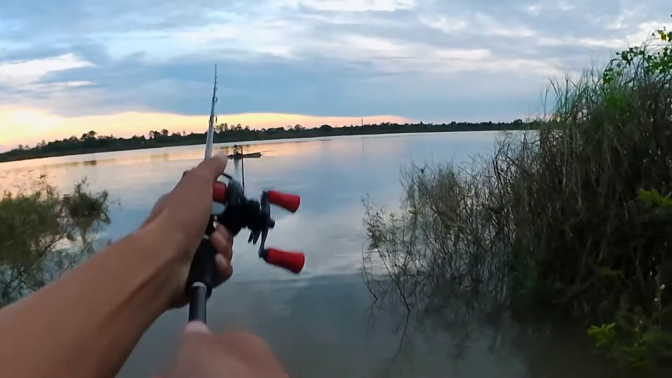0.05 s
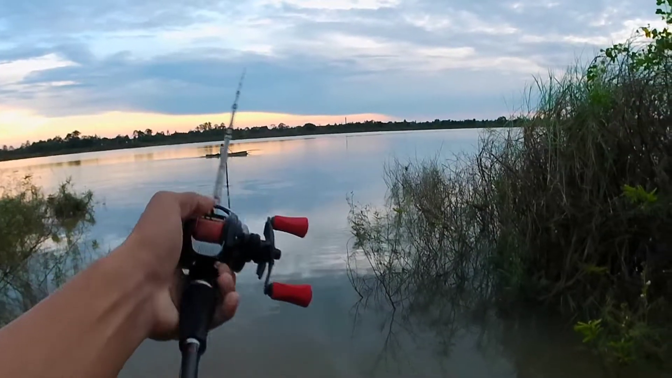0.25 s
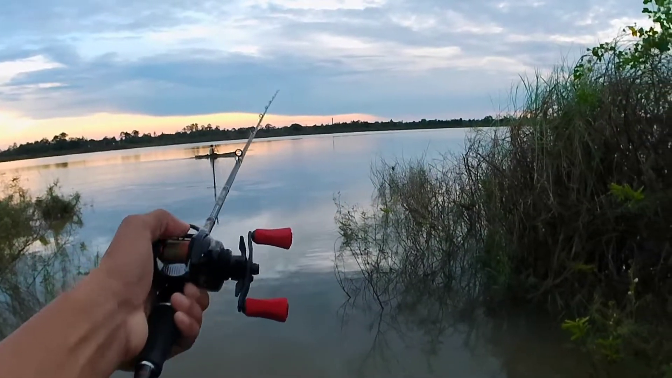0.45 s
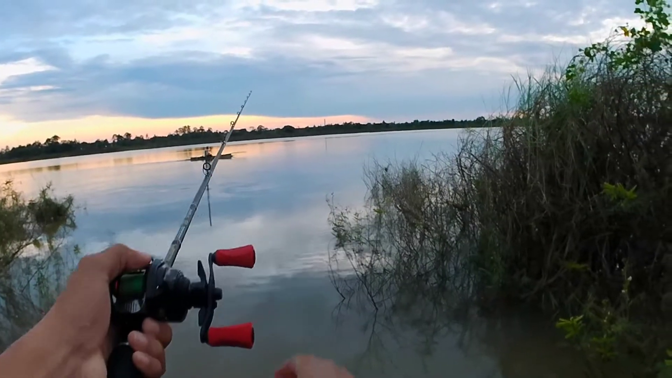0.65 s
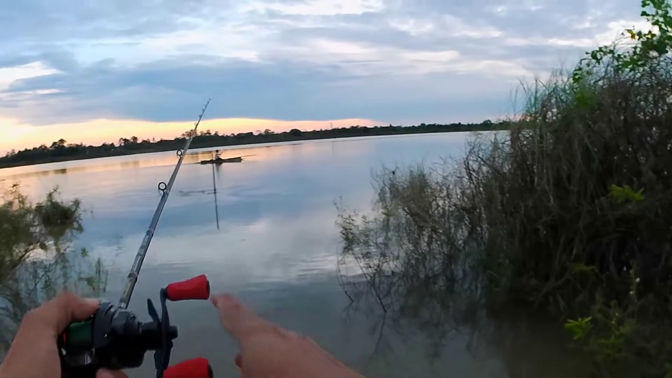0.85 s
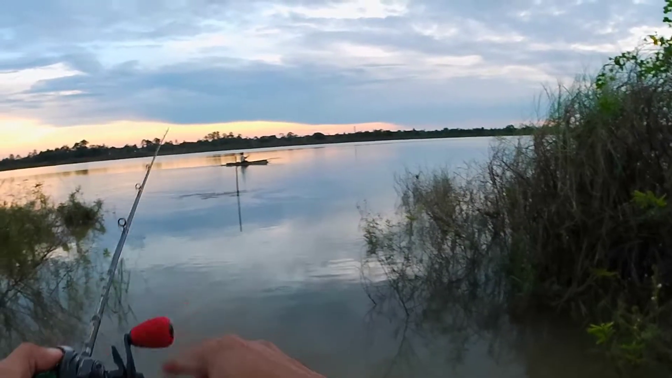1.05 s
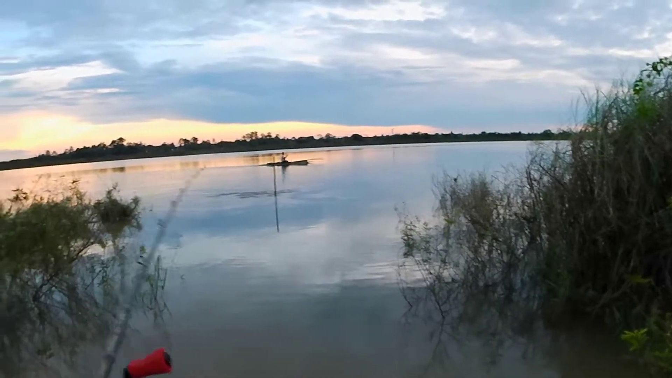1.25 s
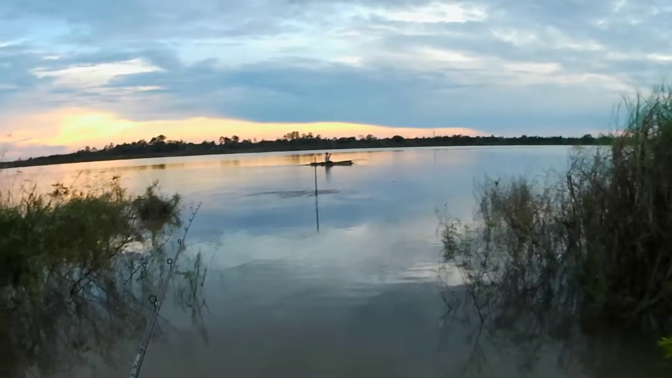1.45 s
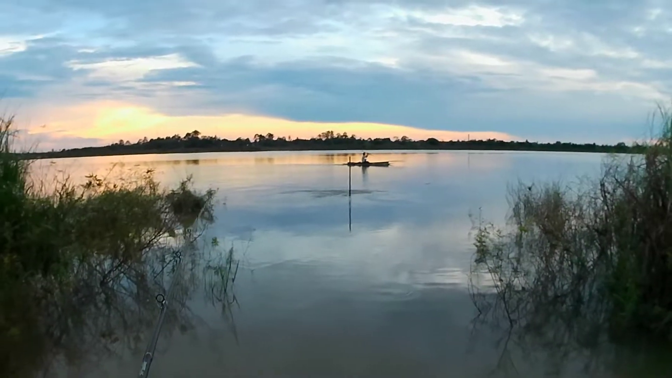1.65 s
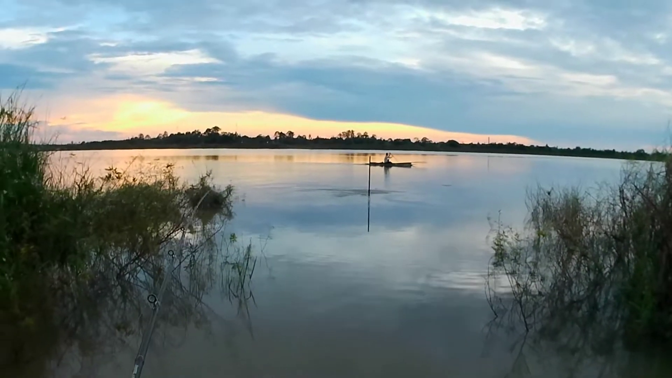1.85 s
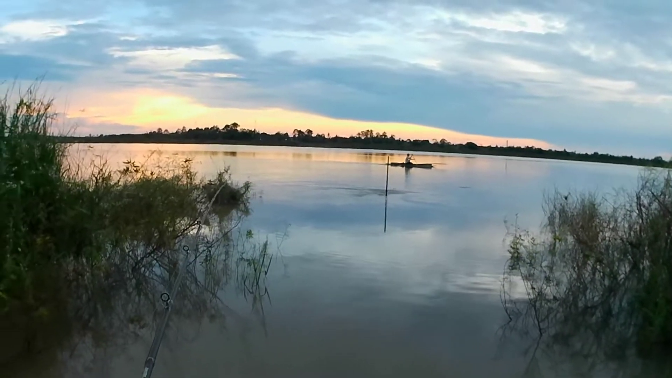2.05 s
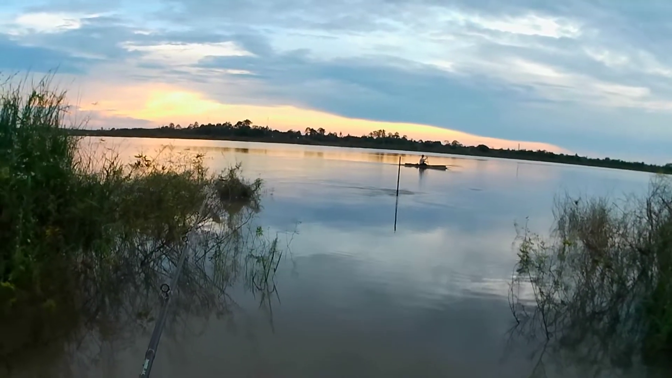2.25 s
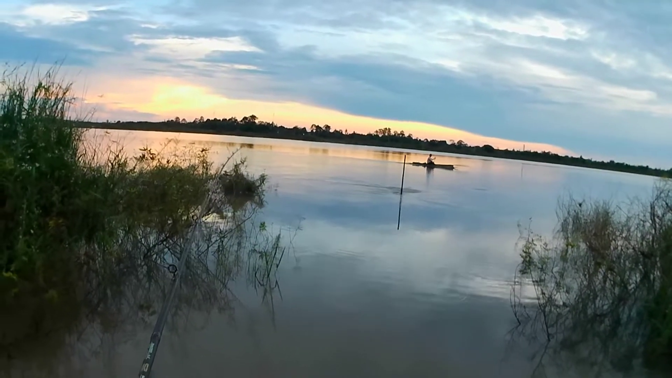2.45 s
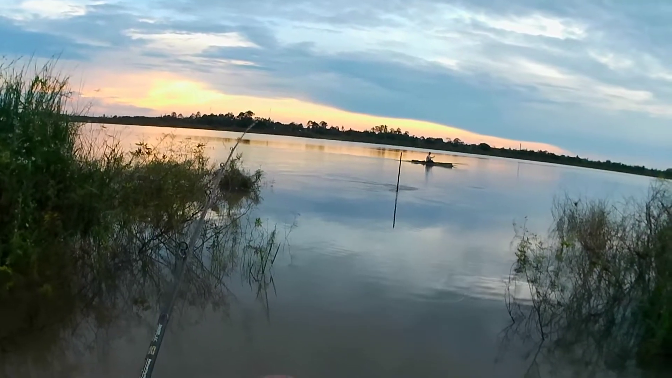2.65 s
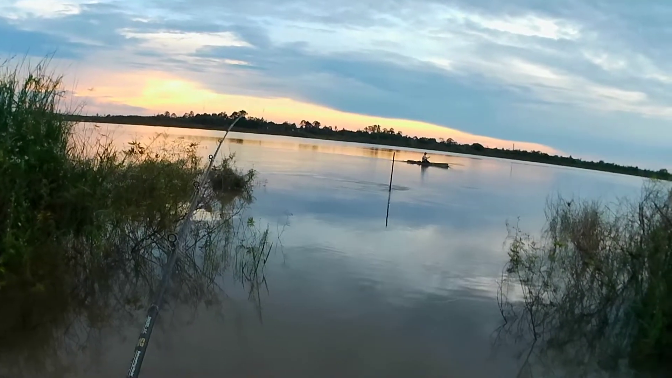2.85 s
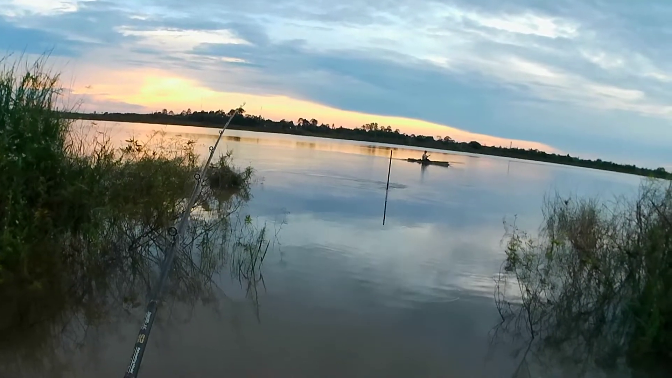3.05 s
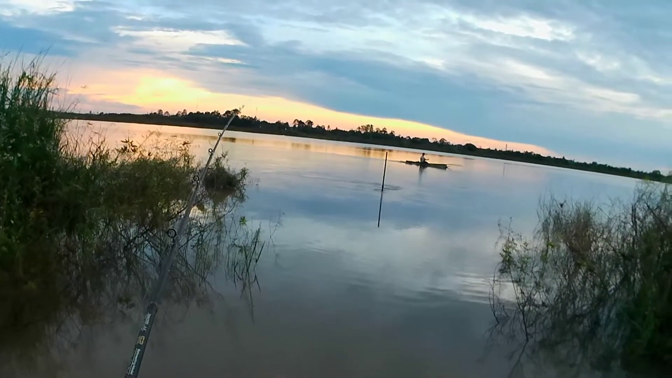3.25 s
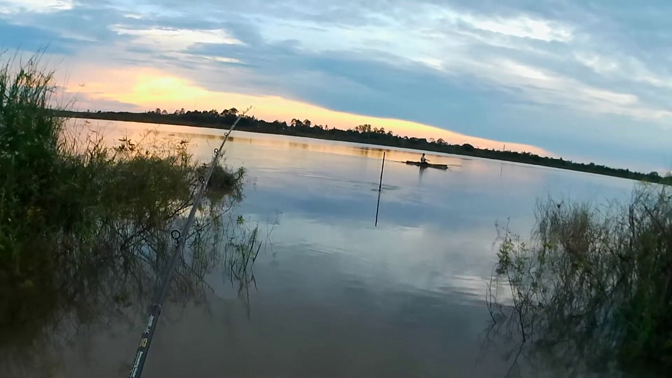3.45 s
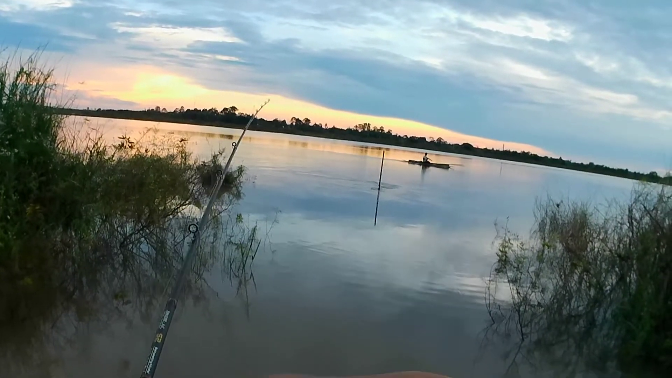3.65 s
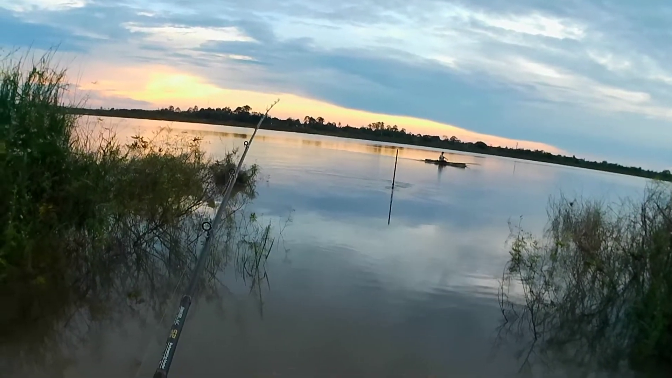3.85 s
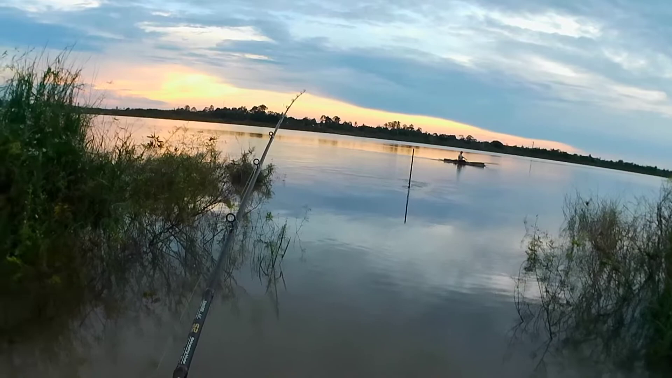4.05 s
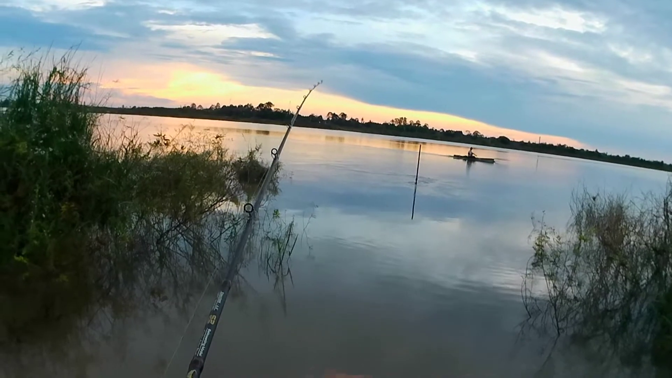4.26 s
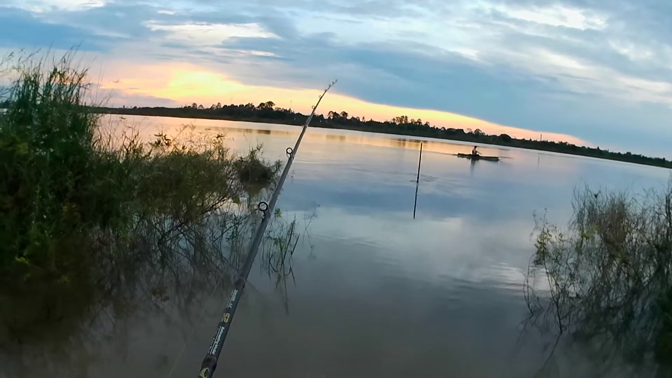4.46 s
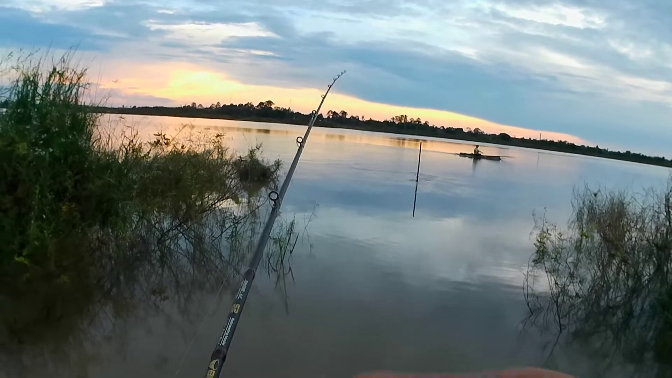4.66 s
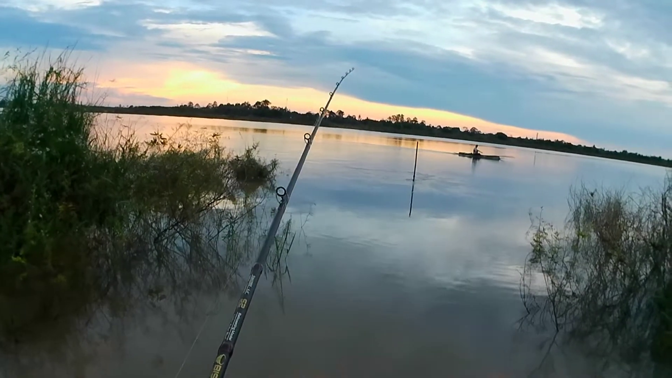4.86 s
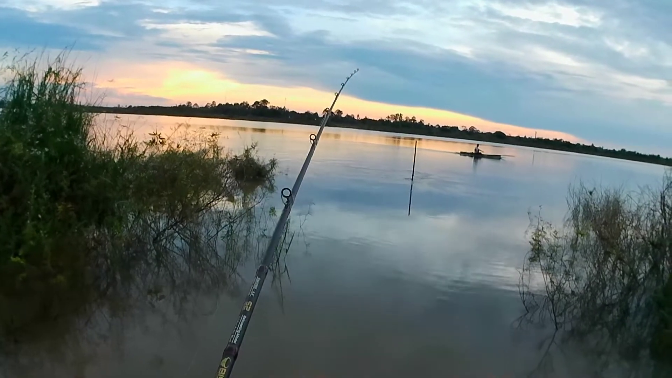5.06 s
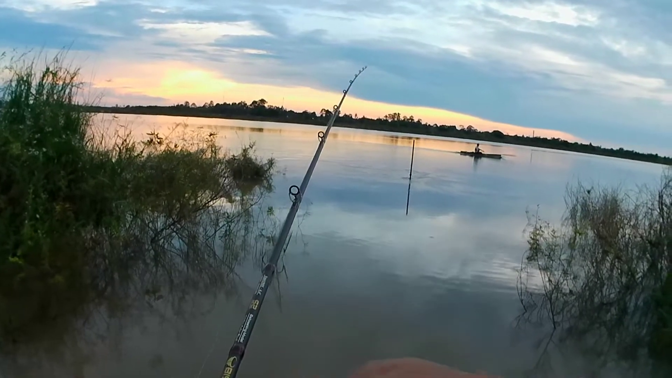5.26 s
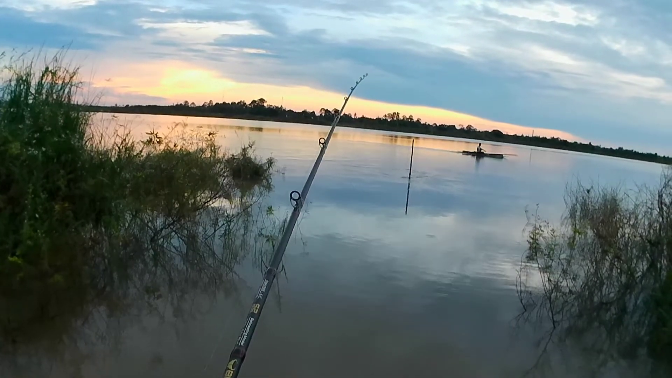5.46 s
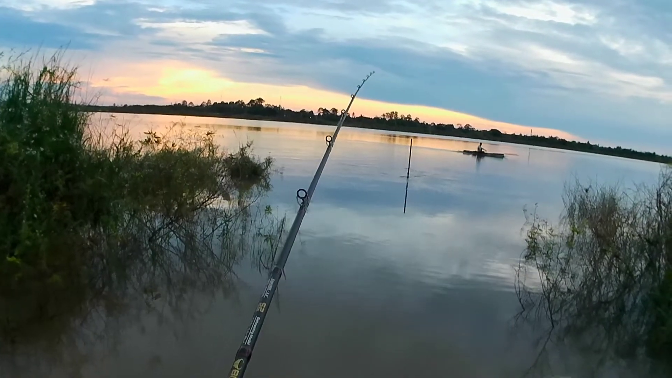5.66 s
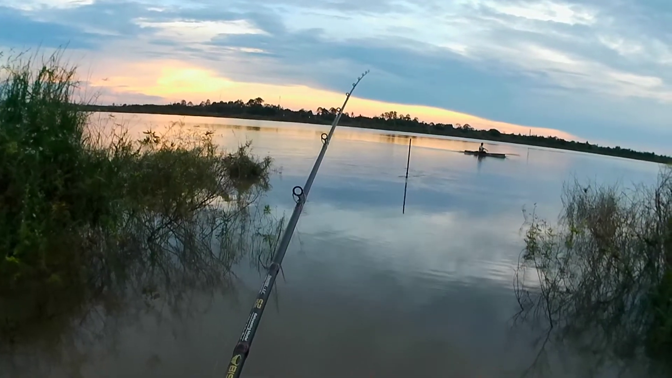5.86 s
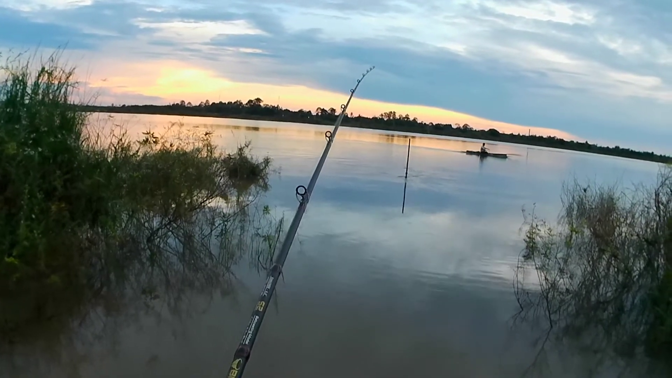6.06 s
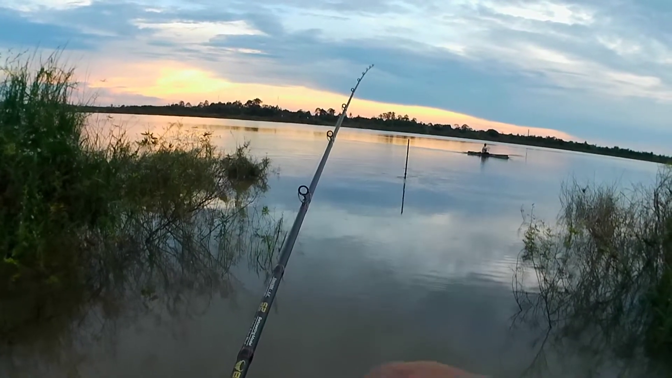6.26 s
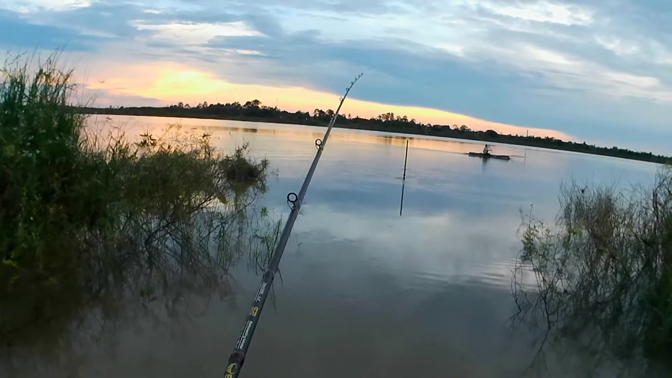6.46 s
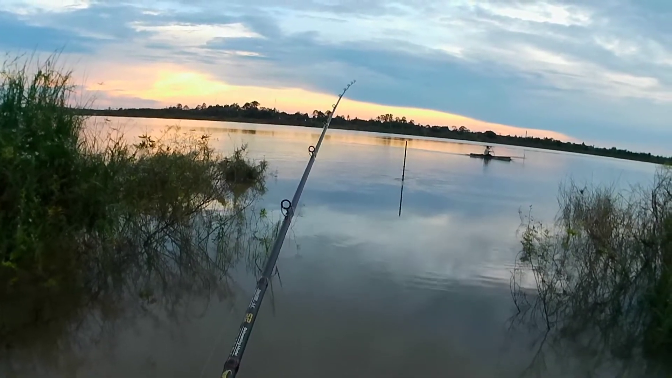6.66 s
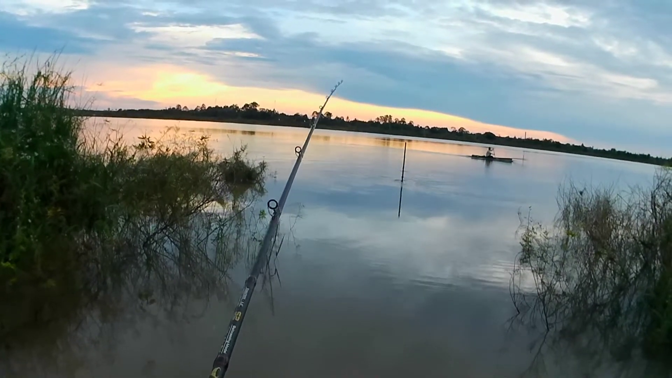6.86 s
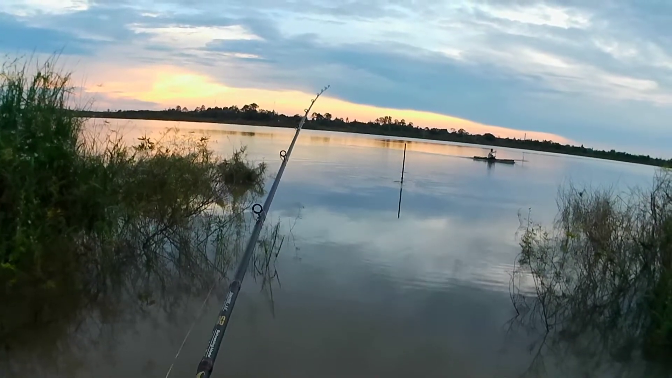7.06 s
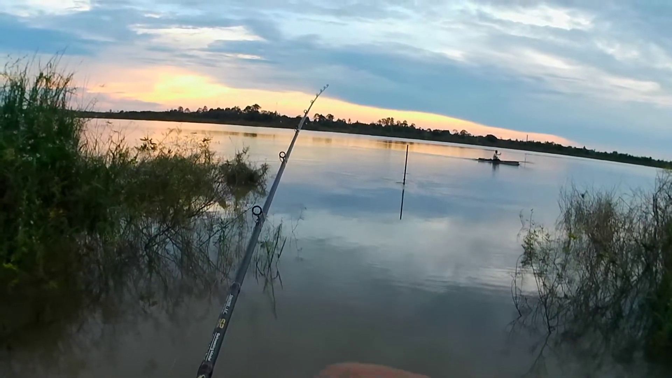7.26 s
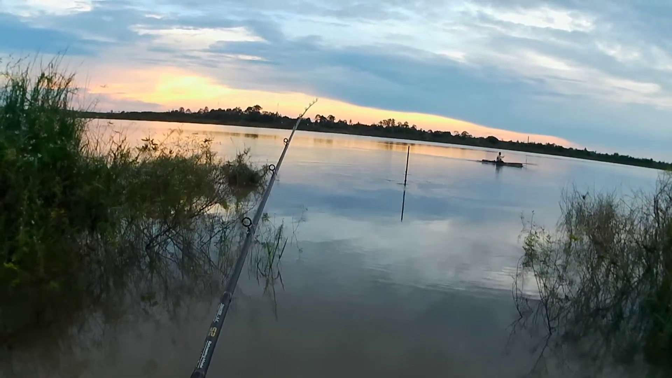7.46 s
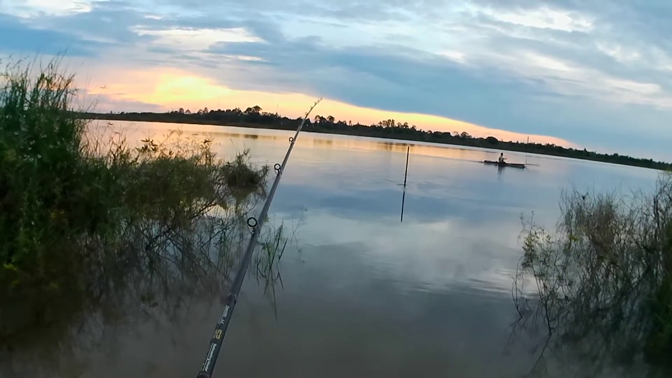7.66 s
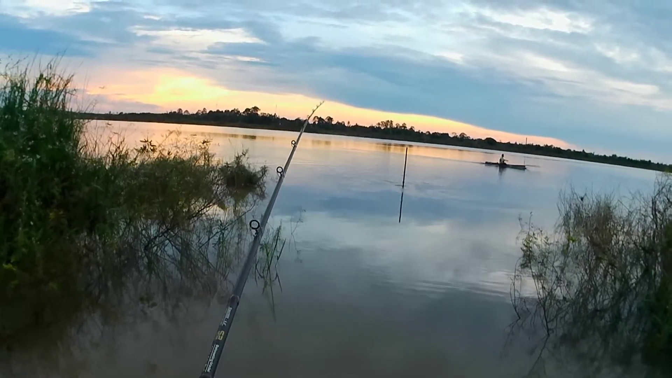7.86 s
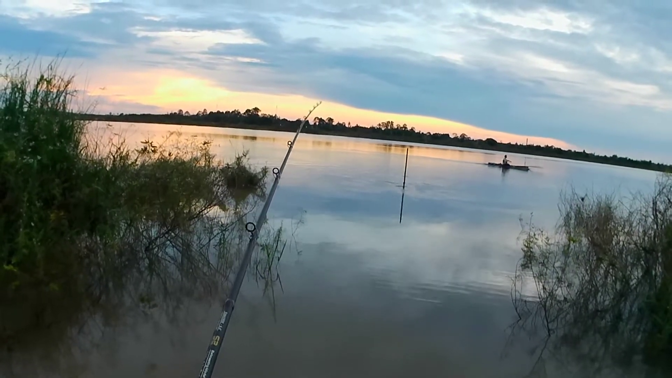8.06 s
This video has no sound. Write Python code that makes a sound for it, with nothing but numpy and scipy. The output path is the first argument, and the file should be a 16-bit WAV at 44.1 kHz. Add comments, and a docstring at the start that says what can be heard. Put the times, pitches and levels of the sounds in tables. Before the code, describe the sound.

Close to the microphone, a casting reel spins with a thin, high, fluttering whir and hissing line, slowing slightly for just over a second until a thumb brushes it still. Hands rub and creak on the grip, then the clutch snaps shut with a sharp metallic clack, by far the loudest sound. Afterwards quiet lakeside air rumbles low, with occasional three-note falling bird chirps, a faint insect and tiny ticks.

```python
"""Reel cast by calm water

A spool whirs as friction noise pulsing once a turn, with hissing line, until a thumb stops it.
Hands rub and creak on the grip; the clutch snaps shut as blows that ring the reel, and small light
ticks sound before and after it. A bird's falling chirps are gliding sines; a low outdoor rumble
and a faint insect are coloured noise."""
import sys
import numpy as np
from scipy import signal
from scipy.fft import rfft, irfft
from scipy.io import wavfile

SR = 44100
rng = np.random.default_rng(int(sys.argv[2]) if len(sys.argv) > 2 else 0)


def to_wav(sig):
    """Store sig (one row per channel, or 1-D mono) as 16-bit WAV at the path in sys.argv[1].

    Samples outside -1..1 are clipped; the rate is SR.
    """
    pcm = np.clip(np.atleast_2d(sig), -1, 1) * 32767
    pcm = np.round(pcm).astype(np.int16)
    wavfile.write(sys.argv[1], SR, pcm.T)  # frames by channels


N = 357518
TIME = np.arange(N) / SR   # s

# The spool coasts down: (time [s], speed [turns per s])
SPOOL_SPEED = [(0, 205), (.2, 204), (.44, 170), (.72, 140), (.92, 138), (1.22, 122)]
# Whir of the bearing: (time [s], level [dB])
WHIR_LEVEL = [(0, -61), (.065, -67), (.12, -60.5), (.42, -57.5), (.67, -51.5), (.73, -58.5), (.82, -60),
              (.87, -58), (1.19, -58.5)]
# Bearing resonances at speed: (frequency [Hz], width [Hz], level [dB])
BEARING_PEAKS = [(9300, 380, 3), (9670, 600, -7)]
# Higher resonances that take over as the spool slows: (frequency [Hz], width [Hz], level [dB])
SCRAPE_PEAKS = [(9900, 760, 1), (10700, 650, -2)]
# Line hissing through the guides: (frequency [Hz], level [dB])
LINE_COLOUR = [(500, -9), (1150, 10.5), (1600, -6), (2100, 3), (3400, -6), (5200, -5), (6100, -3),
               (6800, -22), (8200, -10), (12000, -18)]
# Ringing spool rim: (frequency [Hz], level [dB])
RIM_COLOUR = [(5400, -18), (5800, -4), (6080, 0), (6350, -2), (6700, -22)]
# Thumb braking the spool: (frequency [Hz], level [dB])
THUMB_COLOUR = [(7500, -28), (9300, -10.5), (10600, 5), (11800, -9), (15000, -22)]
SCRAPE_SPEED, SCRAPE_SPEED_WIDTH = 124, 25   # turns per s: both equally loud; spread of the change
RIM_SPEED, RIM_SPEED_WIDTH = 165, 22   # turns per s: the rim rings most near this speed
LINE_DB, RIM_DB, RIM_SWELL_DB = -55.5, -76.5, 16
STOP_S, THUMB_LEAD_S, THUMB_DB = 1.222, .012, -48   # the thumb brakes just before the stop


def spool(sharpness=1.97, steady=0.25, uneven_db=2.5, flutter_db=1.0, hiss_throb=0.59, hiss_waver_db=3.0):
    """The spool scuffs its bearing once a turn while line hisses out, until the thumb stops it."""
    (speed,), (whir_level,) = in_time(SPOOL_SPEED), in_time(WHIR_LEVEL)
    angle = 2 * np.pi * np.cumsum(speed) / SR
    pulse = steady + np.exp(sharpness * (np.cos(angle) - 1))
    scuff = pulse * from_db(uneven_db * drift(129.56))

    # equal-power change from the bearing's resonances to the scrape's
    slow = 1 / (1 + np.exp((speed - SCRAPE_SPEED) / SCRAPE_SPEED_WIDTH))
    fast_part = np.sqrt(1 - slow) * resonate(scuff * noise(), BEARING_PEAKS)
    slow_part = np.sqrt(slow) * resonate(scuff * noise(), SCRAPE_PEAKS)
    bearing = colour(fast_part + slow_part, [(8400, -9), (9000, 1), (10900, 1.5), (11800, -10)])

    hiss_level = from_db(LINE_DB + hiss_waver_db * drift(13.24))
    hiss = hiss_level * colour(noise() * (1 + hiss_throb * scuff), LINE_COLOUR)

    rim_swell = np.exp(-((speed - RIM_SPEED) / RIM_SPEED_WIDTH) ** 2 / 2)
    rim = from_db(RIM_DB + RIM_SWELL_DB * rim_swell) * colour(noise(), RIM_COLOUR)

    brush = swell(STOP_S - THUMB_LEAD_S, rise_db_per_s=650, hold_s=.003, fall_db_per_s=950)
    thumb = from_db(THUMB_DB) * brush * colour(noise(), THUMB_COLOUR)

    running = np.clip((STOP_S - TIME) / 0.025, 0, 1)
    whir = from_db(whir_level + flutter_db * drift(40.2)) * bearing
    return running * (whir + hiss + rim) + thumb


# Modes of the reel: (frequency [Hz], relative level [dB], time to fall 60 dB [s])
REEL_MODES = [(500, -15, .036), (724, -12, .035), (903, -3, .032), (1070, -11, .025), (1219, 1, 0.048),
              (1355, -11, .032), (2100, 1.5, 0.021), (2340, -12, .024), (2850, -5, .016),
              (4570, -18, 0.026), (5260, -5.5, 0.0077), (5690, 1.5, 0.0056), (6180, -4, 0.0093),
              (7070, -9, .012), (9250, -12, .01), (9550, -6, 0.012), (10340, -6, 0.0082),
              (10600, -1.5, 0.0094), (11400, -10, 0.01), (13700, -4, .007)]
# Ranges in which housing, gears and spool ring radiate: (low [Hz], high [Hz])
PART_RANGES = [(250, 5000), (4850, 6390), (8900, 12000)]
# Raw snap of a contact: (frequency [Hz], level [dB])
CRACK_COLOUR = [(300, 7), (1200, 1), (2100, -4), (3900, -8), (5200, 1), (6500, -11), (12000, -17)]
# Loose pieces shaken by the clutch: (frequency [Hz], level [dB])
RATTLE_COLOUR = [(300, -14), (800, -8), (1250, -6), (1650, -12), (2150, 2.5), (2900, -4), (3450, -15),
                 (4400, -6), (5500, 1.5), (6500, -0.5), (8200, -18), (10300, -10), (12500, -26.5),
                 (16000, -29.5)]
CLUTCH_S = 1.408


def reel_clicks(level_db=-3.5, crack_db=-9.5, crack_t60=0.0089, rattle_db=-13.5, rattle_t60=0.024,
                tail_db=-35.5, tail_t60=0.12):
    """Each contact snaps and rings the reel's three parts; the clutch also shakes loose pieces."""
    s, *forces = np.transpose(contacts())
    at = np.round(s * SR).astype(int)
    rings = np.zeros((len(PART_RANGES), N))
    for hz, db, t60 in REEL_MODES:
        part = np.argmin(np.abs(np.mean(PART_RANGES, axis=1) - hz))   # range with the nearest centre
        clicks = np.zeros(N)
        clicks[at] = from_db(forces[part] + db + level_db + rng.normal(0, 0.66, len(at)))
        rings[part] += ring(clicks, hz, t60)

    # a part radiates only within its range, so its ring takes a few cycles to build
    radiated = np.zeros(N)
    for band, part_ring in zip(PART_RANGES, rings):
        band_pass = signal.butter(2, band, "band", fs=SR, output="sos")
        radiated += signal.sosfilt(band_pass, part_ring)

    # the snap grows more slowly with force than the ring: light contacts are mostly snap
    snaps = np.zeros(N)
    snaps[at] = from_db(crack_db + 0.772 * forces[0])
    snap_decay = from_db(-60 / (crack_t60 * SR))
    crack = signal.lfilter([1], [1, -snap_decay], snaps + 1e-18) * colour(noise(), CRACK_COLOUR)

    rattle = from_db(rattle_db) * strike(CLUTCH_S, rattle_t60)
    tail = from_db(tail_db) * strike(CLUTCH_S, tail_t60)
    return radiated + crack + (rattle + tail) * colour(noise(), RATTLE_COLOUR)


# The clutch snaps shut, part after part: (time [s], force [dB], part struck)
CLUTCH_BLOWS = [(1.399, -27, "gears"), (1.4046, -11.5, "spool"), (1.4076, -2.5, "gears"),
                (1.4095, -17, "housing"), (1.4095, -13, "gears"), (1.4106, -7, "spool"),
                (1.4141, -21.5, "housing"), (1.421, -24, "spool")]
# The parts, in the order of their ranges: (name)
PART_ORDER = ["housing", "gears", "spool"]
# How much of a blow on another part reaches housing, gears and spool: (level [dB])
PART_LEAK = [-16, -16, -21]
# Light ticks of the tackle: (time [s], force [dB], extra from each part to the next higher one [dB])
TACKLE_TICKS = [(.8371, -42.5, 2.5), (.9468, -35.5, -2.5), (.986, -42, -12), (3.092, -50, -4),
                (3.6152, -44.5, -4), (4.1184, -44.5, -13), (5.1438, -44.5, -9), (6.471, -48, -13)]
TICK_GEARS_DB = 6.5   # extra force of a tick on the gears


def contacts():
    """Every blow on the reel, as (time [s], force on housing, gears and spool [dB])."""
    blows = []
    for s, db, struck in CLUTCH_BLOWS:
        blows.append([s] + [db + leak * (name != struck) for name, leak in zip(PART_ORDER, PART_LEAK)])
    for s, db, bright in TACKLE_TICKS:
        blows.append([s, db, db + bright + TICK_GEARS_DB, db + 2 * bright])
    return blows


# Skin rubbing on the grip: (frequency [Hz], level [dB])
GRIP_COLOUR = [(130, -5.5), (330, -5), (480, 1.5), (640, 1), (850, -2.5), (1100, -14.5), (1600, -23.5),
               (2050, -18), (2700, -37), (3600, -29), (5300, -24), (7200, -36.5), (12000, -47)]
# The grip slips: (time [s], level [dB], pitch [Hz])
GRIP_SLIPS = [(.868, -37, 382), (.994, -33.5, 840), (1.058, -33, 673), (1.108, -31.5, 315),
              (1.196, -25, 898), (1.254, -17, 540), (1.259, -23, 730), (1.313, -21.5, 636),
              (1.334, -23.5, 398), (1.338, -29.5, 190), (1.352, -21, 593), (1.374, -20.5, 652),
              (1.483, -32.5, 434)]
# Settling sleeve: (frequency [Hz], level [dB])
CLOTH_COLOUR = [(300, 11), (800, -3), (1500, -4), (2200, -10), (3500, -16), (6000, -22)]
RUB_S, RUB_DB = 1.296, -35.5   # the hands rub hardest as they take the handle
SLEEVE_S, SLEEVE_DB = 1.73, -51.5   # a sleeve settles after the cast


def hands(lumpy_db=3.5, slip_t60=0.055, slip_rise_s=0.0015, slip_rough=0.31):
    """Skin sticks and slips on the grip: a grainy rub with short hollow creaks; then a sleeve settles."""
    pressure = from_db(RUB_DB) * swell(RUB_S, rise_db_per_s=35, hold_s=0.095, fall_db_per_s=134)
    lumpy_grains = grains(per_s=2200, spread_db=2.5) * from_db(lumpy_db * drift(70.3))
    rub = pressure * colour(lumpy_grains, GRIP_COLOUR)

    creaks = np.zeros(N)
    for s, db, hz in GRIP_SLIPS:
        soft_start = np.clip((TIME - s) / slip_rise_s, 0, 1)
        creaks += from_db(db) * soft_start * strike(s, slip_t60) * np.sin(2 * np.pi * hz * (TIME - s))

    settling = from_db(SLEEVE_DB) * swell(SLEEVE_S, rise_db_per_s=220, hold_s=0.11, fall_db_per_s=200)
    sleeve = settling * colour(grains(per_s=1600, spread_db=2.5), CLOTH_COLOUR)
    return rub + creaks * (1 + slip_rough * drift(400)) + sleeve


# Bird calls: (time of the last note's middle [s], its level [dB], its pitch there [Hz])
BIRD_CALLS = [(.107, -44.5, 3096), (1.31, -41.5, 3070), (2.815, -45.5, 3070), (3.824, -46.5, 3070),
              (4.757, -45, 3020), (5.907, -42.5, 3055), (7.25, -42, 3035)]
NOTE_GAP_S, NOTE_WIDTH_S, FALL_HZ_PER_S = .064, 0.013, 12400
# earlier notes are softer, higher and fall less steeply, by the square of their distance from the last
LEAD_IN_DB, LEAD_IN_HZ, LEAD_IN_FALL_HZ_PER_S = -3.5, 15, 1500


def bird(rough=0.13, lead_in_rough=0.42, squareness=2.4):
    """Each call is three falling whistles that grow louder, steeper and cleaner."""
    out, flutter = np.zeros(N), drift(250)
    for s, db, hz in BIRD_CALLS:
        for before in range(3):   # notes still to come in this call
            middle = s - before * NOTE_GAP_S
            near = np.abs(TIME - middle) < NOTE_GAP_S / 2
            t = TIME[near] - middle
            pitch = hz + LEAD_IN_HZ * before ** 2
            fall = FALL_HZ_PER_S - LEAD_IN_FALL_HZ_PER_S * before ** 2
            whistle = np.sin(2 * np.pi * (pitch * t - fall * t * t / 2))
            shape = np.exp(-np.abs(t / NOTE_WIDTH_S) ** squareness)
            roughness = 1 + (rough + lead_in_rough * before) * flutter[near]
            out[near] += from_db(db + LEAD_IN_DB * before ** 2) * shape * roughness * whistle
    return out


# Open air: (frequency [Hz], level [dB])
AIR_COLOUR = [(20, -3.5), (40, -0.86), (58, 1), (85, -3), (125, -5), (190, -11.5), (330, -17.5), (600, -24),
              (950, -27.5), (1300, -29), (1700, -33.5), (3200, -37.5), (7000, -42.5), (15500, -45.0)]
# Far-off noise from the shore: (frequency [Hz], width [Hz], level [dB])
SHORE_PEAKS = [(1218, 95, 5.5), (2060, 154, -2.5), (5540, 240, -11)]
# Insect song: (frequency [Hz], level [dB])
INSECT_BAND = [(8700, -21), (9200, 0), (9650, 1), (10100, -22.5)]
AIR_DB = -38
INSECT_DB, INSECT_FADE_S, INSECT_FADE_DB = -75.5, 4.8, -5   # softer, over one second from the fade time


def outdoors(distant_db=-64.0, waver_db=3.0, throbs_per_s=8.7, throb_depth=0.44):
    """Low rumble and hiss of open air, far shore noise and one throbbing insect, all shaped noise."""
    air = from_db(AIR_DB) * colour(noise(), AIR_COLOUR)
    distant = from_db(distant_db + waver_db * drift(4.4)) * resonate(noise(), SHORE_PEAKS)

    throb = 1 + throb_depth * np.sin(2 * np.pi * throbs_per_s * TIME + .6 * drift(2))
    insect_level = from_db(INSECT_DB + INSECT_FADE_DB * np.clip(TIME - INSECT_FADE_S, 0, 1))
    insect = insect_level * throb * colour(noise(), INSECT_BAND)
    return air + distant + insect


def from_db(db):
    """Decibels to an amplitude factor."""
    return 10 ** (np.asarray(db) / 20)


def rms_one(x):
    """Scale a signal to rms 1."""
    return x / np.sqrt(np.mean(x ** 2) + 1e-20)


def in_time(rows):
    """Each column of a curve at every sample."""
    s, *columns = np.transpose(rows)
    return [np.interp(TIME, s, c) for c in columns]


def noise():
    """White noise."""
    return rng.standard_normal(N)


def drift(rate):
    """Random wandering: normal values, so many per second, joined by straight lines."""
    return np.interp(TIME * rate, np.arange(N), noise())


def grains(per_s, spread_db):
    """Tiny friction contacts at random moments, of uneven size and sign."""
    return (rng.random(N) < per_s / SR) * from_db(spread_db * noise()) * np.sign(noise())


def colour(x, points):
    """Shape a signal by (frequency [Hz], level [dB]) points, falling away past its ends; rms 1."""
    hz, db = np.transpose(points)
    f = np.maximum(np.arange(N // 2 + 1) * SR / N, 1)
    skirts = np.minimum(f / hz[0], 1) ** 2 * np.minimum(hz[-1] / f, 1) ** 2
    gain = skirts * from_db(np.interp(np.log(f), np.log(hz), db))
    return rms_one(irfft(rfft(x) * gain, N))


def resonate(x, peaks):
    """Parallel resonances of (frequency [Hz], width [Hz], level [dB]), alternating in sign; rms 1."""
    out = 0
    for k, (hz, width, db) in enumerate(peaks):
        r = np.exp(-np.pi * width / SR)
        feed = [(1 - r * r) / 2, 0, (r * r - 1) / 2]
        feedback = [1, -2 * r * np.cos(2 * np.pi * hz / SR), r * r]
        out = out + (-1) ** k * from_db(db) * signal.lfilter(feed, feedback, x)
    return rms_one(out)


def ring(clicks, hz, t60):
    """Each unit click sets a decaying sine of height 1 ringing."""
    r, w = from_db(-60 / (t60 * SR)), 2 * np.pi * hz / SR
    return signal.lfilter([0, np.sin(w)], [1, -2 * r * np.cos(w), r * r], clicks + 1e-18)


def strike(s, t60):
    """An envelope that jumps to 1 and dies away by 60 dB in t60 seconds."""
    return (TIME >= s) * from_db(-60 * np.clip((TIME - s) / t60, 0, 10))


def swell(s, rise_db_per_s, hold_s, fall_db_per_s):
    """An envelope that grows to 1 at s, holds and dies away."""
    below = rise_db_per_s * np.maximum(s - TIME, 0)
    after = fall_db_per_s * np.maximum(TIME - s - hold_s, 0)
    return from_db(-below - after)


def scene():
    """The reel and hands in front, the bird and open air behind, as one channel."""
    return (spool() + hands() + reel_clicks() + bird() + outdoors())[None]


CUTOFF_HZ = 15900


def record(dry):
    """A steep low-pass cuts the top."""
    low_pass = signal.ellip(10, .1, 80, CUTOFF_HZ, fs=SR, output="sos")
    return signal.sosfilt(low_pass, dry)


dry = scene()
out = record(dry)
to_wav(out)
```